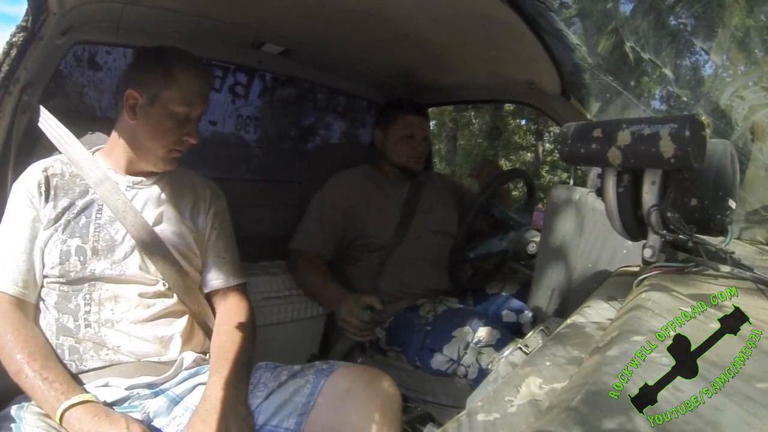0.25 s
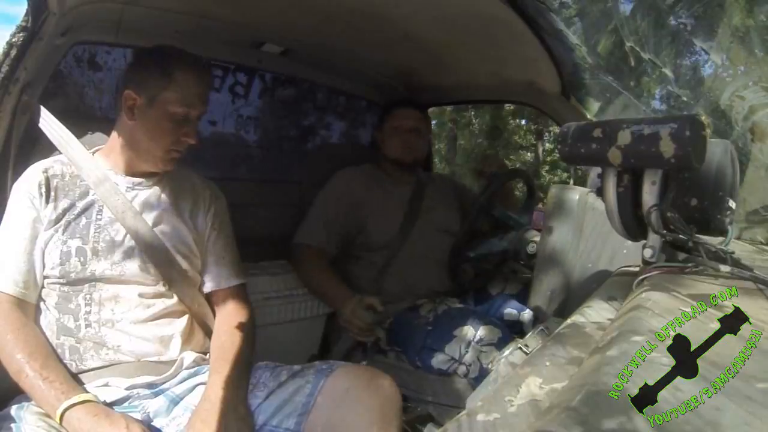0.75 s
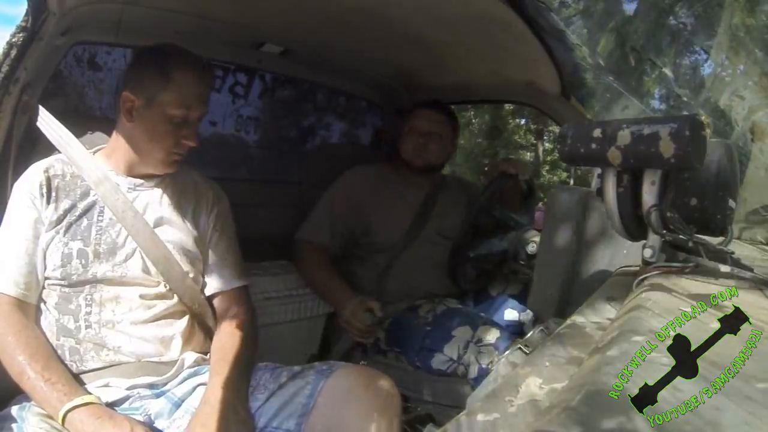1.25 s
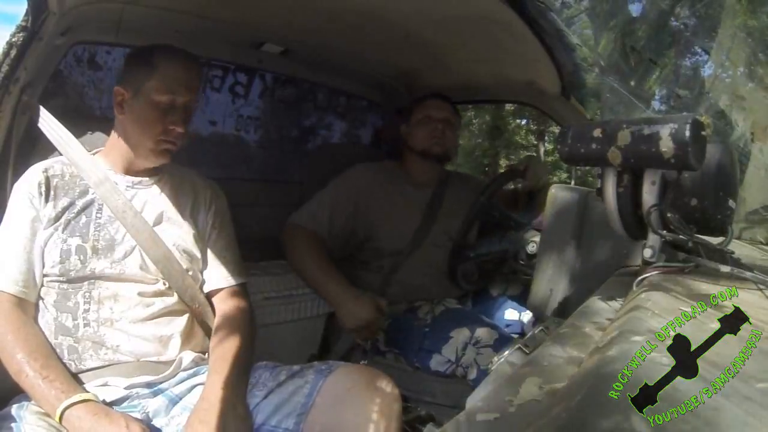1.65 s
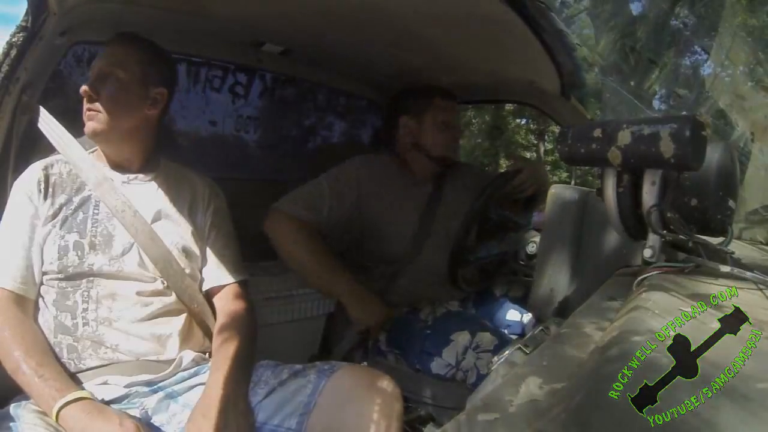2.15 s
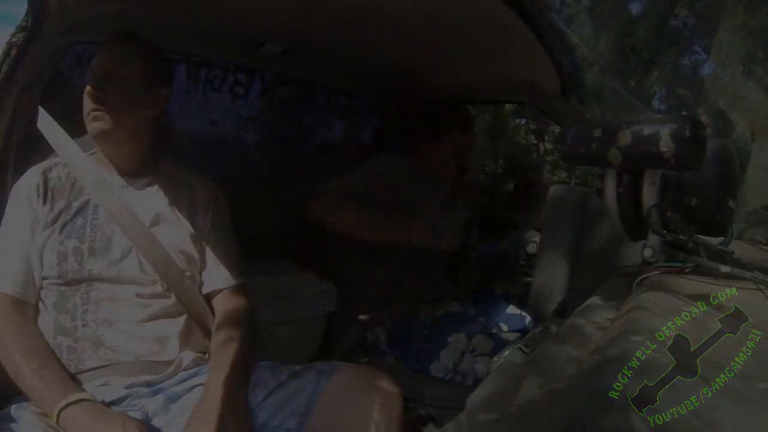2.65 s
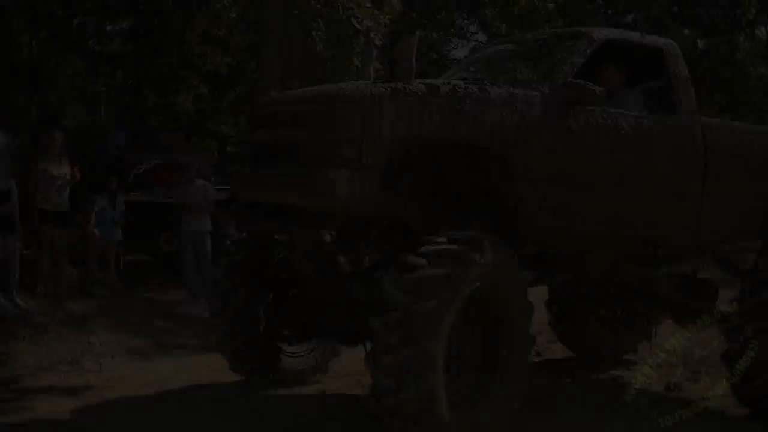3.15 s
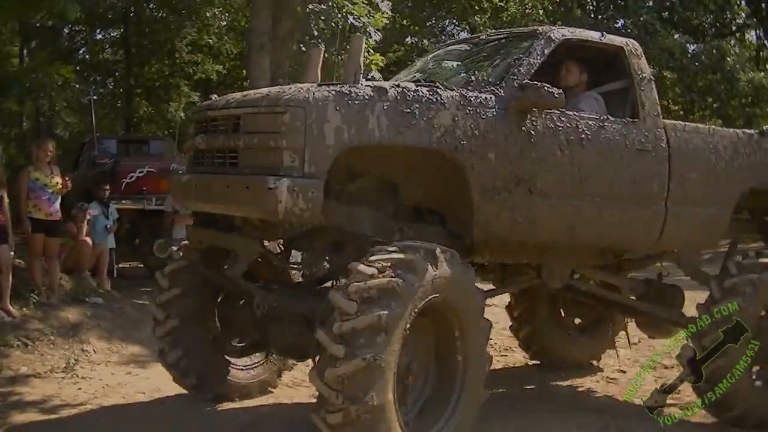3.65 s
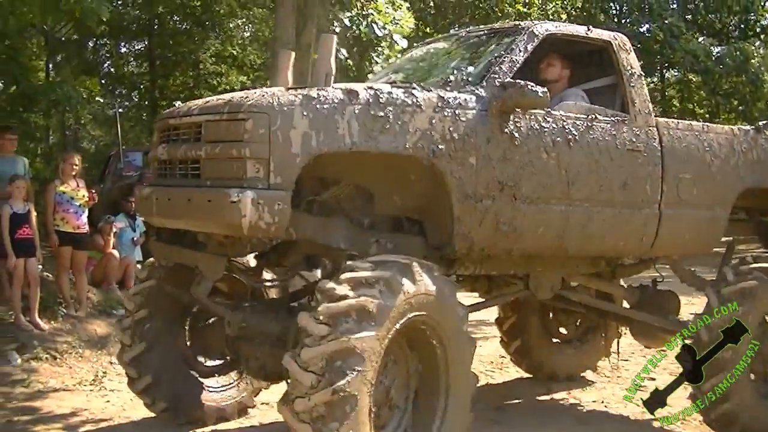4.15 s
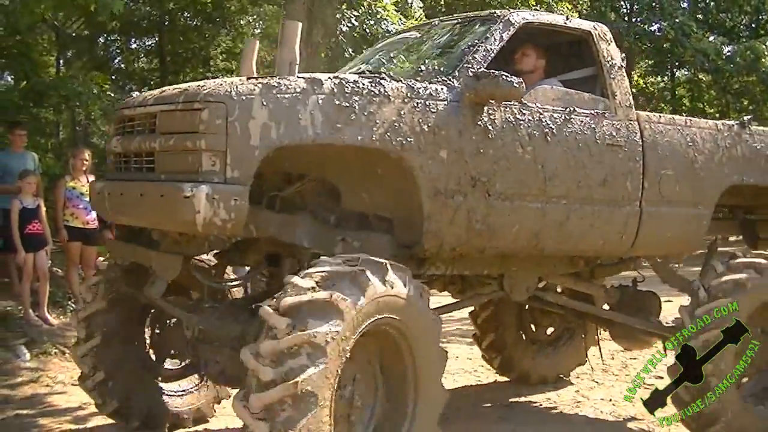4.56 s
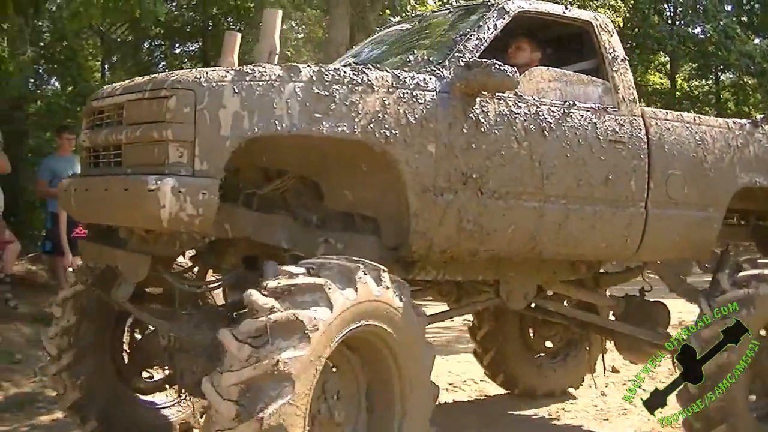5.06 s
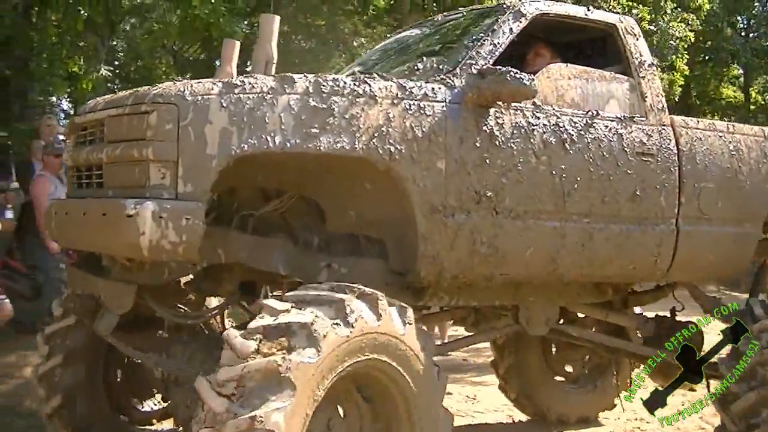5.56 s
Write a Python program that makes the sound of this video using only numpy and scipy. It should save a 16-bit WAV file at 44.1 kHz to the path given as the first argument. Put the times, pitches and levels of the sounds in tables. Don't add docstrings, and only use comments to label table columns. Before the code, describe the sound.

Inside a truck cab a lumpy idle booms and rattles, fades out, then harsh, distorted open exhaust blares in from outside.

```python
import sys
import numpy as np
from scipy import signal
from scipy.fft import rfft, irfft, next_fast_len
from scipy.io import wavfile
from scipy.ndimage import map_coordinates

SR = 44100
rng = np.random.default_rng(int(sys.argv[2]) if len(sys.argv) > 2 else 0)


def undo_db(level):
    steps = np.asarray(level, float) / 20
    return 10 ** steps


def transcribe(u):
    v = np.clip(np.atleast_2d(u).T, -1, 1)
    q = np.round(v * 32767).astype(np.int16)
    wavfile.write(sys.argv[1], SR, q)


N = 255780

# start_s, level_db
STACK_LEVEL = [(3.055, -57), (3.09, -35.5), (3.16, -29), (3.19, -31), (3.22, -22.5), (3.34, -23.5),
               (3.37, -16), (3.49, -17.5), (3.6, -14.5), (3.9, -11.5), (4.1, -13), (5.2, -8.5), (5.8, -14)]
# level_db, phase_turns
STACK_PARTIALS = [(0, 0), (-4.5, 0), (-13, .3), (-14, .6), (-14, .1), (-15, .8), (-12, .4), (-13, .2)]
PARTIAL_STEPS = [0, -3, -6, -4, -2, -1, -8, 3]
# start_s, pitch_hz
STACK_NOTE = [
    (3.05, 106.5),
    (3.8, 107),
    (4.05, 105),
    (4.3, 105.7),
    (5.1, 107.3),
    (5.4, 97.82),
    (5.55, 97.4),
    (5.68, 91.53),
    (5.8, 92.1),
]
# start_s, count_throbs
THROBS = [(3.05, .16), (3.25, 4.16), (3.85, 16.19), (4.0, 19.17), (4.3, 25.04), (4.9, 37.02), (5.2, 43.12),
          (5.5, 49.11), (5.8, 54.12)]
# start_s, level_db
RASP_THROUGH = [(3.06, 6.5), (3.3, 7), (3.45, 5), (3.65, 3), (3.95, -4.5), (4.2, -0.5), (4.4, 6), (4.6, -5),
                (4.9, 11), (5.18, 12.5), (5.3, 19), (5.45, 2.5), (5.8, -2.5)]
# frequency_hz, density_db_per_hz
RASP_SPECTRUM = [(150, -27), (300, -8.5), (600, -6), (1100, -4), (1700, -6), (2600, -1.5), (4200, -31.5),
                 (7000, -11.5), (11000, -4.5), (15800, -27)]
# frequency_hz, density_db_per_hz
ROAR_SPECTRUM = [(60, -20), (130, 0), (300, -2), (600, -11), (1500, -22), (5000, -32), (12000, -40)]
# frequency_hz, gain_db
MIC_RESPONSE = [(20, 37), (50, 20), (100, 6.5), (180, 6.5), (270, 9.5), (400, 3), (540, 8.5), (680, 7),
                (1100, 6.5), (2000, 1), (10000, -3.5), (15800, -10.5)]
# start_s, peak_db, ring_hz
BARK_EVENTS = [(3.209, -21.5, 1110), (3.372, -15, 1150), (3.62, 4, 1177), (3.683, -1.5, 788),
               (3.721, -2, 806), (3.773, -2.5, 880), (3.81, -6.5, 830), (3.904, -3, 956), (3.989, 4, 802),
               (4.05, -8.5, 717), (4.151, -0.5, 692), (4.291, 2.5, 1217), (4.325, -0.5, 1027),
               (4.377, -2, 900), (4.584, 4.5, 1220), (4.666, -5, 834), (4.924, 0, 1200), (4.959, -6.5, 980),
               (5.245, -11, 910), (5.307, -10, 1062), (5.348, -9, 710), (5.37, -3, 1172),
               (5.42, -2.5, 1020), (5.47, -5.5, 1080), (5.498, -8, 810), (5.588, -3.5, 914),
               (5.684, -5, 855), (5.764, -1, 882)]
# start_s, peak_db
CRACK_EVENTS = [(3.0624, -26), (3.1717, -29), (3.2096, -23), (3.3613, -14), (3.4151, -16), (3.8082, 2),
                (3.9044, -11.5), (4.024, -1.5), (4.0507, -10.5), (4.2717, -16), (4.322, -1), (4.4323, 9),
                (4.5256, -2.5), (4.584, 1.5), (4.678, 2.5), (4.7157, 6), (4.7721, 9.5), (4.8648, 2.5),
                (5.0125, 1.5), (5.1602, 10.5), (5.1687, -4), (5.2594, -12.5), (5.3148, 7.5), (5.5228, -12)]
# start_s, firing_hz, half_step_note_hz, firing_db
IDLE_COURSE = [(0.0, 41.2, 57.3, -19.5), (0.3, 40.7, 59.3, -15.5), (0.6, 41.46, 59.3, -20.5),
               (0.8, 43.1, 62, -21), (0.95, 40.1, 57.5, -23), (1.04, 48, 60.05, -22.5),
               (1.15, 52.8, 56.2, -15), (1.27, 48.1, 55.5, -16.5), (1.45, 48.65, 57.46, -20),
               (1.66, 53.15, 58.05, -13), (1.8, 48, 59.5, -17), (1.9, 44, 68.7, -19),
               (1.97, 39.6, 69.9, -15.5), (2.14, 39.4, 63.3, -19), (2.3, 43.73, 62.5, -17.5),
               (2.63, 47.14, 65.14, -20.5), (2.78, 44.7, 60.8, -17), (3.07, 46.2, 56.5, -21)]
# centre_s, note_loss_db, half_step_loss_db, octave_loss_db
WEAK_FIRINGS = [(.1, 0, 3, 7), (.23, 16, 5, 15), (.36, 8, 2, 0), (.51, 7, 3, 10), (0.622, -3, 0, 1.5),
                (.79, 22, -3, -2), (.89, -7, 10, 6), (1.01, 10, -4, 1.5), (1.17, 14, 6, 3),
                (1.31, 0, 17, 8), (1.499, 5, 13, 4), (1.57, 1, 8, 3), (1.63, 1.5, 1, 1),
                (1.729, 27, -1, -2), (1.87, 14, 7, 7), (2.0, -1.5, 1, 12), (2.22, 12, 18, 11),
                (2.31, 2, 10, 10), (2.4, 0.5, 18, 7), (2.541, 3, 8, 8), (2.6, 9, -2, -3), (2.7, 6, 19, 10),
                (2.8, 4, 10, 3), (2.88, -1, -3, 0)]
# centre_s, half_width_s, level_db
FRAME_HEAVES = [(.08, 0.095, -21), (.56, 0.066, -27), (.8, 0.082, -22), (.93, 0.066, -16.5),
                (1.16, 0.061, -18.5), (1.46, 0.041, -14.5), (1.79, 0.06, -21), (1.96, 0.049, -26),
                (2.32, 0.051, -28), (2.6, 0.056, -25.5), (2.88, 0.067, -36)]
# start_s, length_s, strength_db
IDLE_SURGES = [(0, 0.045, 6), (0.222, 0.087, 5), (0.477, 0.16, 6.5), (.75, 0.2, 5), (1.015, 0.091, 6),
               (1.36, .12, 6), (1.528, 0.16, 5), (1.719, 0.08, 5), (1.896, 0.249, 5), (2.23, 0.24, 6.5),
               (2.555, 0.084, 5.5), (2.722, 0.071, 2), (2.834, 0.14, 5)]
# frequency_hz, density_db_per_hz
THUMP_SPECTRUM = [(7.1, -33.5), (12, -6), (32, 0.5), (54, -9.5), (96, -14), (119, -10), (200, -26),
                  (260, -63), (440, -120)]
# frequency_hz, width_hz, gain_db
PANEL_MODES = [(743, 30, -1.5), (1177, 147, -2), (1620, 153, -0.5), (2214, 104, -5.5), (2485, 190, -12),
               (3190, 250, -13), (3740, 150, -20)]
# frequency_hz, density_db_per_hz
DRONE_SPECTRUM = [(100, -31), (170, -6.5), (210, -2.5), (248, -1.5), (382, -14.5), (404, -14.5),
                  (445, -5.5), (494, -18.5), (690, -17), (839, -28), (900, -16.5), (1170, -46.5),
                  (1980, -120)]
# frequency_hz, density_db_per_hz
AIR_SPECTRUM = [(500, -20), (900, -15), (1600, -14), (2300, -21.5), (3500, -26.5), (4900, -30), (5600, -33),
                (8000, -36.5), (12000, -46.5), (13000, -62.5), (15000, -101.5)]
# start_s, peak_db, brightness_db
CLACK_EVENTS = [(0.423, -37, -27), (0.9024, -36, -27), (1.0215, -36, -24), (1.069, -27, -5.5),
                (1.0782, -38, -11), (1.5297, -33, -24), (1.6357, -31, -26), (1.7734, -28, -28),
                (1.9866, -39.5, -19), (2.121, -29.5, -26), (2.232, -34, -30), (2.7754, -33, -33)]
# start_s, peak_db
TICK_EVENTS = [(0.0014, -54), (0.1241, -42.5), (0.171, -43), (0.2843, -44), (0.3052, -51), (0.3601, -53),
               (0.4065, -50), (0.569, -46), (0.632, -46), (0.6709, -49), (0.8365, -46), (0.8846, -47),
               (0.9737, -43), (1.0864, -51), (1.1164, -52), (1.1459, -56), (1.2087, -45), (1.2864, -53),
               (1.4546, -46), (1.493, -49), (1.546, -46), (1.5802, -47), (1.6597, -43), (1.785, -43),
               (1.945, -48), (2.1287, -41.5), (2.2666, -50), (2.4442, -44), (2.6367, -46), (2.7392, -48)]
# frequency_hz, width_hz, gain_db
TRIM_MODES = [(1670, 83, 2.5), (2560, 170, 5.5), (3250, 200, -5), (3900, 110, -9.5), (4860, 130, -21.5),
              (5900, 130, -15)]
# start_s, peak_db, ring_hz
THUD_EVENTS = [
    (.972, -21.5, 230),
    (1.064, -11.5, 115),
]

CAM_SWING_DB, CAM_OPEN_TURNS = 2.5, 0.55
PIN_DB, PIN_SHARP, PIN_TURNS = 6.5, 12, -0.012
PUFF_DB = 1.35
SHADE_S, SHADE_RISE_S, SHADE_DEPTH, SHADE_HZ = 5.22, 0.15, 0.32, 4600
STUMBLE_S = 0.023
HALF_DB, UPPER_DB, HUM_DB, PANEL_DB, DRONE_DB = -15, -22, -42, -49, -46
SURGE_RISE_S = 0.03
PANELS_FOLLOW, HUM_FOLLOWS = 0.73, 0.65
CAB_FADE_S, CAB_END_S, FADE_POWER = 0.52, 3.13, 1.76
TOP_HZ = 15780


def stacks():
    level_db, = curves(STACK_LEVEL)
    turns = np.cumsum(curves(STACK_NOTE)[0]) / SR
    cam = curves(THROBS)[0] / 3
    through_db = rasp_through(cam)
    overload_db = np.clip(13 - 0.5 * through_db, 8, 19)
    shared = undo_db(overload_db) * (exhaust_bass(turns, cam) + undo_db(-6) * noise(ROAR_SPECTRUM))
    skew = undo_db(-16.0) * np.gradient(shared) * SR / 670 + undo_db(-19.5) * shared
    apart = skew + rasp(through_db) + undo_db(-3.5 - level_db) * barks() + undo_db(3.5 - level_db) * cracks()
    heard = np.clip(shared + apart, -1, 1) - np.clip(shared - apart, -1, 1)
    puffs = undo_db(PUFF_DB * (wobble(170) + wobble(450)))
    heard = 0.23 * unit(filtered(heard * puffs, microphone))
    shade = SHADE_DEPTH * np.clip((np.arange(N) / SR - SHADE_S) / SHADE_RISE_S, 0, 1)
    heard = heard - shade * filtered(heard, resonances([(SHADE_HZ, 3500, 0)]))
    limited = heard / (1 + np.abs(heard) ** 12) ** (1 / 12)
    return undo_db(np.minimum(level_db + 12.5, 0.7)) * limited * (np.arange(N) > 3.056 * SR)


def rasp_through(cam):
    swing_db = CAM_SWING_DB * np.cos(2 * np.pi * (cam - CAM_OPEN_TURNS))
    pinned = np.exp(PIN_SHARP * (np.cos(2 * np.pi * (cam - PIN_TURNS)) - 1))
    return curves(RASP_THROUGH)[0] + swing_db - PIN_DB * pinned


def exhaust_bass(turns, cam):
    bass = 0
    for step, (db, phase) in zip(PARTIAL_STEPS, STACK_PARTIALS):
        bass = bass + undo_db(db + 1.5 * wobble(12)) * np.sin(2 * np.pi * (turns + step * cam + phase))
    return bass


def rasp(through_db):
    crackle = undo_db(2 * wobble(9) + 3.5 * wobble(45) + 4 * wobble(150) + 3 * wobble(700))
    return 0.5 * unit(crackle * noise(RASP_SPECTRUM)) * undo_db(0.5 * through_db)


def barks():
    t, out = np.arange(SR // 25) / SR, np.zeros(N + SR)
    for s, db, ring_hz in BARK_EVENTS:
        swell = np.sin(np.pi * np.clip(t / 0.011, 0, 1)) ** 0.67
        ring = np.sin(2 * np.pi * (ring_hz * t + rng.random()))
        out[round(s * SR):][:len(t)] += undo_db(db) * swell * ring
    return out[:N]


def cracks():
    spits = bursts(CRACK_EVENTS, t60=0.15, attack=0.0015)
    return filtered(spits, lambda hz: hz / (hz + 1200) / (1 + (hz / 4200) ** 2))


def microphone(hz):
    return undo_db(along(MIC_RESPONSE, hz)) * -hz * hz / (230 ** 2 - hz * hz + 1j * hz * 230 * 1.46)


def boom():
    firing_hz, half_hz, firing_db = curves(IDLE_COURSE)
    weak = np.array(WEAK_FIRINGS)
    note_loss, half_loss, upper_loss = bells(weak[:, 0], STUMBLE_S, np.abs(weak[:, 1:]))
    t = np.arange(N) / SR
    note = np.sqrt(2) * np.sin(2 * np.pi * (np.cumsum(firing_hz) / SR + 0.14 * wobble(4.14)))
    half = np.sqrt(2) * np.sin(2 * np.pi * (np.cumsum(half_hz) / SR + 0.079 * wobble(9.9)))
    half *= undo_db(HALF_DB - half_loss - 7 + 2.0 * wobble(9))
    thump = undo_db(firing_db - note_loss - 7) * noise(THUMP_SPECTRUM, 29, 56)
    hum = noise([(100, 2), (125, 0.5), (180, -6)], 101, 180)
    hum *= undo_db(HUM_DB + HUM_FOLLOWS * surge() + 3.0)
    octave = np.sqrt(2) * np.sin(2 * np.pi * (89 * t + 0.04 * wobble(9)))
    steady = np.clip((1.05 - t) / 0.22, 0.1, 0.9)
    upper = np.sqrt(steady) * octave + np.sqrt(1 - steady) * noise(THUMP_SPECTRUM, 70, 101)
    upper *= undo_db(UPPER_DB - upper_loss - 3.1 * (1 - steady))
    return undo_db(firing_db - note_loss) * note + half + thump + hum + upper + frame_shake()


def frame_shake():
    s, width, heave_db = np.transpose(FRAME_HEAVES)
    t = np.arange(N) / SR
    shake = np.sin(2 * np.pi * (22 * t + 0.15 * wobble(5))) + 0.5 * noise(THUMP_SPECTRUM, 15, 30)
    heave = bells(s, width, undo_db(heave_db + 1.5))[0] + undo_db(-41)
    return heave * shake


def surge():
    t = np.arange(N) / SR
    total_db = 0
    for s, length, db in IDLE_SURGES:
        inside_s = np.minimum(t - s, s + length - t)
        total_db = total_db + db * np.clip(inside_s / SURGE_RISE_S + 0.5, 0, 1)
    return total_db


def rattle():
    surge_db = surge()
    panel_db, drone_db = PANEL_DB + PANELS_FOLLOW * surge_db, DRONE_DB + surge_db
    flutter = undo_db(1.1 * wobble(40.34) + 2.0 * wobble(120))
    ring = unit(filtered(rng.standard_normal(N) * flutter, resonances(PANEL_MODES)))
    ring = filtered(ring, lambda hz: 1 / (1 + (hz / 4000) ** 4))
    fizz = unit(noise(AIR_SPECTRUM, 500) * flutter)
    drone = unit(noise(DRONE_SPECTRUM, 170, 950) * undo_db(2.94 * wobble(24.97)))
    return undo_db(panel_db) * (undo_db(1.0) * ring + undo_db(-8.0) * fizz) + undo_db(drone_db + 1.25) * drone


def clacks():
    dull = bursts([(s, db + 9.5) for s, db, _ in CLACK_EVENTS], t60=0.025, attack=0.00092)
    bright = bursts([(s, db + bright_db + 7) for s, db, bright_db in CLACK_EVENTS], t60=0.013, attack=0.00055)
    thin = bursts([(s, db + 8.0) for s, db in TICK_EVENTS], t60=0.013, attack=0.0013)
    knocks = filtered(dull, resonances([(1200, 230, 7.5), (1670, 390, 2.5), (2240, 230, -9)]))
    knocks += undo_db(17.5) * filtered(bright, resonances(TRIM_MODES))
    knocks = filtered(knocks, lambda hz: 1 / (1 + 1j * hz / 6500 - (hz / 6500) ** 2) ** 4)
    tick_tone = [(1500, -25.5), (3000, 4.5), (6000, -6), (10000, -16.0), (12500, -18.5), (15000, -50)]
    return knocks + filtered(thin, lambda hz: undo_db(along(tick_tone, hz)))


def thuds():
    t = np.arange(N) / SR
    out = np.zeros(N)
    for s, db, ring_hz in THUD_EVENTS:
        cycles = np.clip(t - s, 0, 1) * ring_hz
        out += undo_db(db - 4 * cycles) * np.clip(cycles / 1.5, 0, 1) * np.sin(2 * np.pi * cycles)
    return out


def bursts(events, t60, attack):
    t, out = np.arange(SR // 20) / SR, np.zeros(N + SR)
    decay = undo_db(-60 * t / t60) + 0.11 * undo_db(-15 * t / t60)
    shape = decay * np.clip(t / attack, 0, 1)
    for s, db in events:
        out[round(s * SR):][:len(t)] += undo_db(db) * shape * rng.standard_normal(len(t))
    return out[:N]


def bells(centres_s, widths_s, heights):
    t = np.arange(0, N, 64) / SR
    bumps = np.exp(-0.5 * ((t[:, None] - np.asarray(centres_s)) / widths_s) ** 2) @ np.asarray(heights)
    return np.array([np.interp(np.arange(N) / SR, t, b) for b in np.atleast_2d(bumps.T)])


def resonances(peaks):
    def response(hz):
        total = 0
        for k, (centre, width, db) in enumerate(peaks):
            damping = 1j * hz * width
            total = total + (-1) ** k * undo_db(db) * damping / (centre * centre - hz * hz + damping)
        return total
    return response


def noise(spectrum, lo_hz=0, hi_hz=22000):
    def response(hz):
        return undo_db(along(spectrum, hz)) * (hz > lo_hz) * (hz < hi_hz)
    return unit(filtered(rng.standard_normal(N), response))


def filtered(x, response):
    m = next_fast_len(N + SR // 2)
    return irfft(rfft(x, m) * response(np.fft.rfftfreq(m, 1 / SR)), m)[..., :N]


def wobble(rate):
    knots = rng.standard_normal(int(N * 900 / SR) + 4)
    return map_coordinates(knots, [np.arange(N) * min(rate, 900) / SR])


def curves(rows):
    s, *cols = np.transpose(rows)
    return [np.interp(np.arange(N) / SR, s, c) for c in cols]


def along(points, hz):
    f, v = np.transpose(points)
    return np.interp(np.log(hz + 1), np.log(f + 1), v)


def unit(x):
    return x / np.sqrt(np.mean(x ** 2) + 1e-20)


def scene():
    fade = np.clip((CAB_END_S - np.arange(N) / SR) / CAB_FADE_S, 0, 1) ** FADE_POWER
    cab = boom() + rattle() + clacks() + thuds()
    return (cab * fade + stacks())[None]


def roll_off(x):
    return signal.sosfilt(signal.butter(12, 15850, fs=SR, output="sos"), x)


def record(dry):
    mix = filtered(dry, lambda hz: np.clip((TOP_HZ - hz) / 100 + 1, 0, 1))
    return roll_off(mix)


dry = scene()
out = record(dry)
transcribe(out)
```